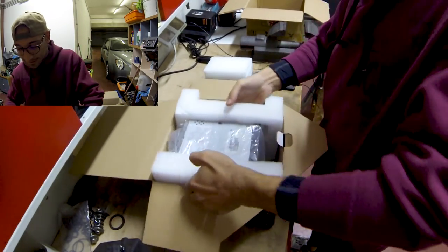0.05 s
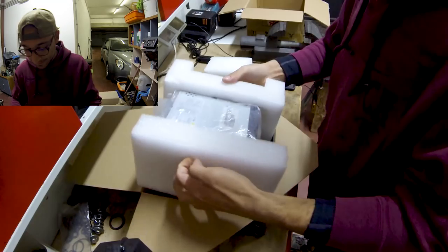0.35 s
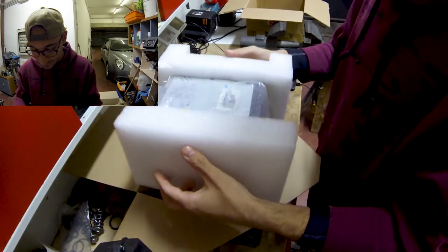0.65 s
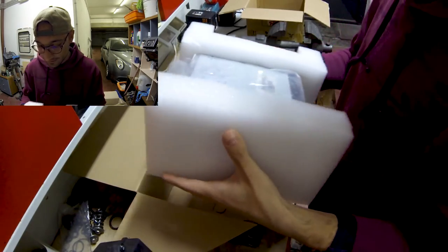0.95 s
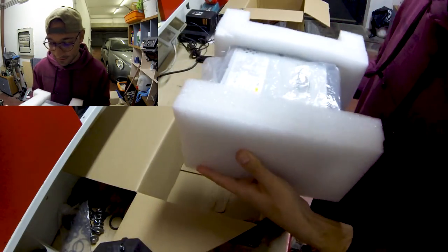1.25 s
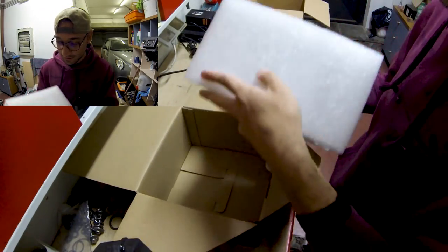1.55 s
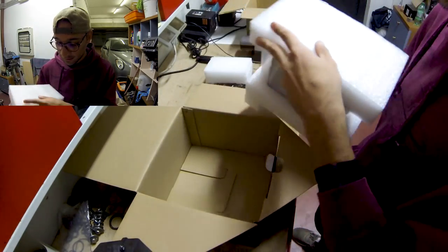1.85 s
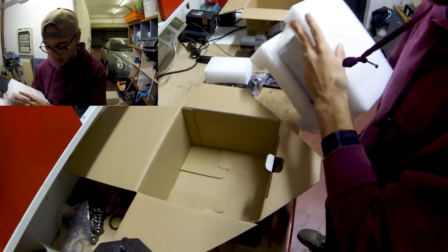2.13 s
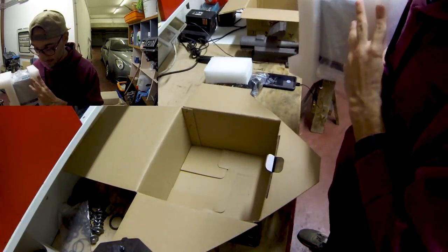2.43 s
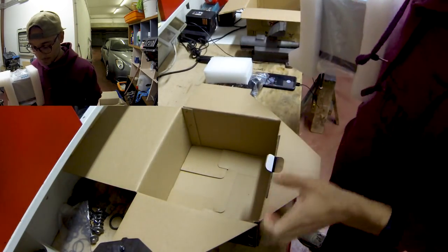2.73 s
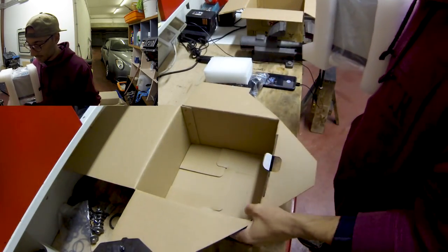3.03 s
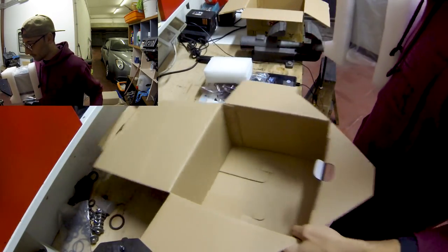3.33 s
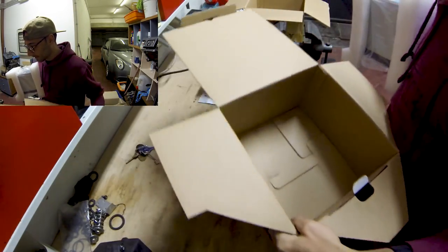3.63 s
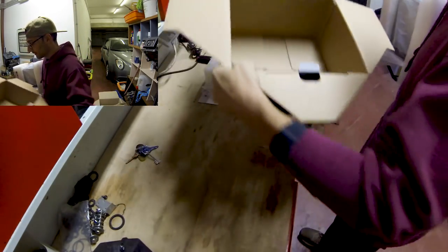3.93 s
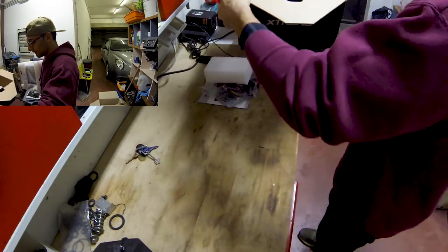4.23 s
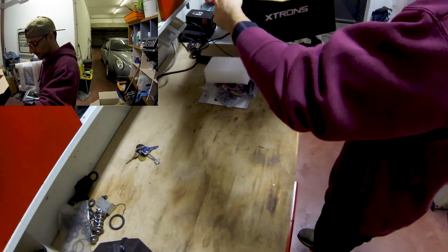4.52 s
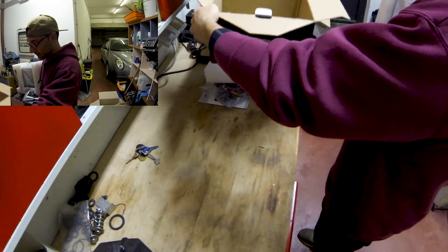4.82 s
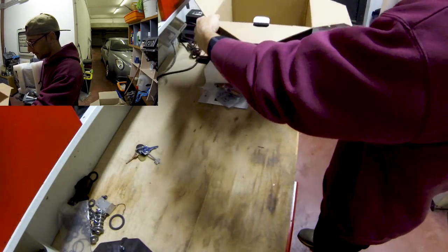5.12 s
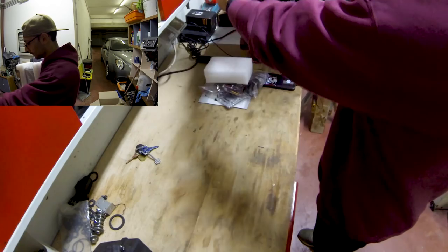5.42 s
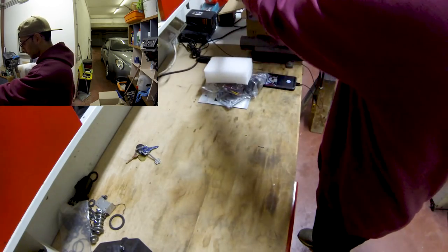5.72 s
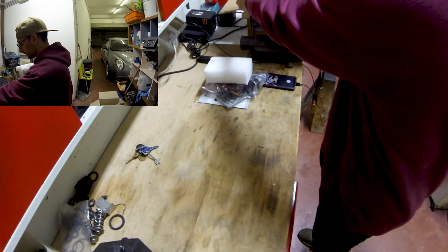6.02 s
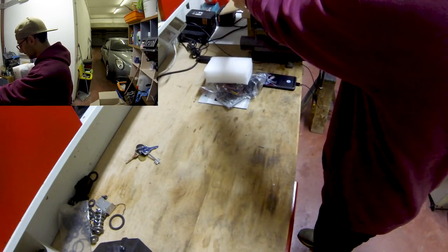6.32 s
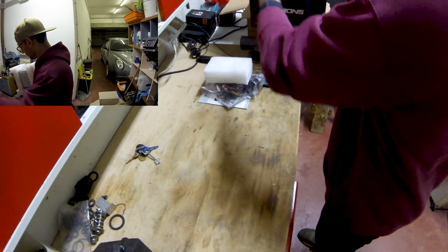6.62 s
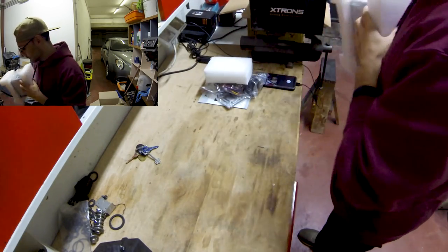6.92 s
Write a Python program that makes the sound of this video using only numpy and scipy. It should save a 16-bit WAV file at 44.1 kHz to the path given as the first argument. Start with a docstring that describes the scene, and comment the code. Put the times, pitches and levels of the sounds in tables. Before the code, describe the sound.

Foam scrapes and squeaks out of a cardboard box, then the empty box is dragged, clangs against metal and knocks down on wood.

```python
"""In a small, faintly humming garage, a foam-packed, plastic-wrapped unit is drawn out of a cardboard box.
Stick-slip friction makes the foam scrape and squeak; the box walls thump and sway, the wrapping crackles.
The empty box is dragged, a flap tapping the workbench, and is picked up with a light knock.
It clangs against something of metal, whose modes ring on, and is set down on wood with a louder knock.
Last, hands grip the foam again."""
import sys
import numpy as np
from scipy import signal
from scipy.fft import rfft, irfft, next_fast_len
from scipy.io import wavfile

SR = 44100
rng = np.random.default_rng(int(sys.argv[2]) if len(sys.argv) > 2 else 0)


def master_out(mix):
    """Clip the mix to full scale and print it as 16-bit PCM to the path in sys.argv[1]."""
    frames = np.transpose(np.atleast_2d(mix))
    ceiling = np.clip(frames, -1, 1)
    pcm = np.round(ceiling * 32767).astype(np.int16)
    wavfile.write(sys.argv[1], SR, pcm)


N = 311346
TIME = np.arange(N) / SR

# Spectrum of a sharp snap. Each row: frequency in Hz, relative spectral density in dB.
SNAP_SPECTRUM = [(200, -45), (550, -7), (900, 7), (1400, 1), (1900, 11.5), (2600, -2), (3200, 2.5),
                 (4300, -14), (5200, -7), (7300, -25), (8800, -15), (11000, -28), (15000, -41)]
# Spectrum of a dry cardboard impact. Each row: frequency in Hz, relative spectral density in dB.
CLACK_SPECTRUM = [(100, -10.5), (250, 2), (850, 1), (1350, -8), (1850, -1), (2600, -23), (3300, -16.5),
                  (4400, -27.5), (5200, -24.5), (7200, -39), (9000, -32), (15000, -42)]


def amp(db):
    """Amplitude ratio of a level in decibels."""
    return 10 ** (np.asarray(db) / 20)


def unit(x):
    """Normalisation to an rms of 1."""
    return x / np.sqrt(np.mean(x ** 2) + 1e-20)


def read(points, hz):
    """Interpolation of a table on a logarithmic frequency axis."""
    f, value = np.transpose(points)
    return np.interp(np.log(hz + 1), np.log(f + 1), value)


def add(mix, s, sound):
    """Superposition of a sound on the mix, starting at s seconds."""
    part = mix[max(round(s * SR), 0):][:len(sound)]
    part += sound[:len(part)]


def colour(x, points, tilt_db=0, skirt_db=0, size=4096):
    """Minimum-phase filter of a given spectrum; tilt about 2 kHz and outer skirts are in dB per octave."""
    hz = abs(np.fft.fftfreq(size, 1 / SR)) + 1
    octaves_outside = abs(np.log2(hz / np.clip(hz, points[0][0], points[-1][0])))
    db = read(points, hz) + tilt_db * np.log2(np.maximum(hz, 200) / 2000) - skirt_db * octaves_outside
    log_gain = np.log(amp(np.maximum(db, -100)))
    response = np.exp(np.conj(signal.hilbert(log_gain)))
    return signal.oaconvolve(x, np.fft.ifft(response).real)[:len(x)]


def wander(cutoff_hz, size=N):
    """Random fluctuation: low-pass Gaussian noise of rms 1."""
    padded = next_fast_len(size)
    hz = np.fft.rfftfreq(padded, 1 / SR)
    spectrum = rfft(rng.standard_normal(padded)) * (hz < cutoff_hz)
    return unit(irfft(spectrum, padded)[:size])


def fade(x, t60s, hold_s=0):
    """Frequency-dependent damping: after a hold, each band decays exponentially at its own rate."""
    hz, t, bands = signal.stft(x, SR, nperseg=256)
    decay = 1000. ** (-np.maximum(t - hold_s, 0) / read(t60s, hz)[:, None])
    return signal.istft(bands * decay, SR, nperseg=256)[1][:len(x)]


def ring(modes):
    """Free vibration: a sum of damped sinusoids that start together."""
    t = TIME[:2 * SR]
    return sum(amp(db) * 1000. ** (-t / t60) * np.sin(2 * np.pi * hz * t) for hz, db, t60 in modes)


def onset(rise_s):
    """Exponential rise towards 1, as when a force takes time to build."""
    return 1 - np.exp(-TIME[:2 * SR] / rise_s)


def burst(spectrum, decay_s, tilt_db=0):
    """A transient of exponentially decaying, filtered noise with a peak of about 1."""
    envelope = np.exp(-TIME[:2 * SR] / decay_s)
    noise = rng.choice([-1., 1.], len(envelope))
    crack = colour(noise * envelope, spectrum, tilt_db, skirt_db=6)
    return .5 * crack * np.linalg.norm(envelope) / np.linalg.norm(crack)


def swell(peak_s, build_s, die_s, edge_db=-16.5):
    """Envelope of a hand stroke: a rounded peak, at edge_db one build_s before and one die_s after."""
    before = np.maximum(peak_s - TIME, 0) / build_s
    after = np.maximum(TIME - peak_s, 0) / die_s
    near, gain = before + after < 4, np.zeros(N)
    gain[near] = amp(edge_db * (before[near] ** 1.7 + after[near] ** 1.56))
    return gain


def background(floor_db=-58.5, swell_db=3.0):
    """Ambient noise: hiss, amplitude-modulated rumble, and a phase-modulated hum and electrical whine."""
    # Noise floor of the room. Each row: frequency in Hz, relative spectral density in dB.
    floor_spectrum = [(20, -17.5), (32, -4), (50, -9.5), (100, -17), (170, -20), (280, -24), (420, -26),
                      (650, -28), (1400, -34.5), (1900, -33.5), (2450, -38.5), (3000, -30.5), (3800, -40.5),
                      (7000, -45.5), (11000, -48), (15000, -52)]
    # Hum and whine. Each row: frequency in Hz, rms level in dB.
    steady_tones = [(49, -59), (10645, -78), (10691, -88)]
    air = amp(floor_db) * unit(colour(rng.standard_normal(N), floor_spectrum, skirt_db=3.5))
    rumble = signal.sosfiltfilt(signal.butter(2, 200, fs=SR, output="sos"), air)
    tones = sum(amp(db) * unit(np.sin(2 * np.pi * hz * TIME + 1.03 * wander(3.4)))
                for hz, db in steady_tones)
    return air + rumble * (amp(swell_db * wander(6.1)) - 1) + tones


def rubbing(slips_per_s=2200, spread_db=2.0, judder_db=1.6):
    """Sliding friction: tiny slips, bunched by the hand's judder, excite surface, cavity, walls and foam."""
    # Spectra of the surface scrape, the box's hollow, its flexing panels and the fizz of foam cells.
    # Each row: frequency in Hz, relative spectral density in dB.
    scrape = [(1100, -34.5), (1400, -5), (1700, 2.5), (1950, 4), (2300, -1), (2600, 0), (3100, -44)]
    hollow = [(480, -25.5), (640, -8.5), (780, 2), (900, 0), (1120, 0), (1350, -7), (1650, -36)]
    panels = [(90, -7.5), (160, -1.5), (270, 1), (390, 3.5), (580, -5.5), (800, -16.5)]
    fizz = [(2100, -28), (2700, 0), (3150, 2), (3650, -1), (4300, -10), (5100, -4.5), (6200, -12.5),
            (7400, -20), (8700, -12.5), (10000, -23), (11000, -17), (12200, -29), (13400, -20.5),
            (15300, -38)]
    # The foam is drawn out, the unit turned over (2 s), the box moved (from 3 s), the foam gripped (7 s).
    # Each row: time of the hardest push, build-up and die-away in seconds, scrape level in dB,
    # then the levels of hollow, panels and fizz in dB relative to the scrape.
    strokes = [ (.01, 0.087, .2, -40, -3.5, -10.5, -9), (.18, .13, 0.31, -39.5, -3.5, -5, -1.5),
               (.355, 0.019, 0.071, -54, 4, 16, -10), (.565, 0.077, 0.04, -46, 2, -3, -1),
               (.74, 0.11, 0.11, -42, -8, -13, -5.5), (0.806, 0.068, 0.015, -40, -7, -12, -5),
               (.86, .04, 0.072, -55, 7, -6, -0.5), (1.02, 0.096, 0.077, -55.5, 6, -5, 0.5),
               (1.159, 0.081, 0.11, -43.5, -3.5, -9, -4.5), (1.421, 0.087, 0.085, -45, -3, -11, -8.5),
               (1.555, 0.068, 0.091, -44, 1.5, -13.5, -2), (1.645, .04, 0.052, -51.5, 0.5, -3, 0),
               (1.82, 0.11, 0.1, -47.5, 2, -10.5, -4), (2.006, 0.11, .08, -48, -3.5, -2, -0.5),
               (2.28, 0.13, 0.22, -60, 1.5, -2, -3), (2.435, 0.036, 0.14, -58, 4.5, 5.5, -6),
               (2.537, 0.038, 0.032, -45, -6.5, -11, -8.5), (2.55, 0.096, 0.17, -62.5, 1, -1, -4.5),
               (2.959, .003, 0.044, -52, 6.5, -3, -4.5), (3.015, 0.043, 0.056, -48, 1, 1.5, -2.5),
               (3.133, 0.039, 0.074, -57, 6, 6, -3.5), (3.214, 0.042, 0.044, -55, 2, 0, -3),
               (3.544, 0.037, 0.044, -61, -1, -13, -6), (3.604, 0.025, 0.025, -66, 15, 0, 6),
               (3.745, 0.12, 0.052, -63.5, 0, -3, -2), (4.15, 0.15, 0.18, -66, 1.5, -7, -4),
               (4.29, 0.049, 0.08, -67, 4, -3, -5), (4.43, 0.044, 0.13, -68.5, 1.5, -15, -9),
               (6.945, 0.018, 0.044, -48, 10.5, 2.5, -2), (6.985, 0.17, 0.083, -53.5, 0.5, 0, -6.5)]
    sizes = amp(spread_db * np.minimum(rng.exponential(1, N), 4)) * rng.choice([-1, 1], N)
    slips = unit(sizes * (rng.random(N) < slips_per_s / SR))
    friction = (slips + rng.standard_normal(N)) * amp(judder_db * wander(63))
    voices = np.array([unit(colour(friction, spectrum, skirt_db=23.0))
                       for spectrum in (scrape, hollow, panels, fizz)])
    power = np.zeros_like(voices)  # overlapping strokes add in power
    for s, build_s, die_s, db, hollow_db, panels_db, fizz_db in strokes:
        gains = amp(db) * amp([0, hollow_db, panels_db, fizz_db])
        power += np.outer(gains, swell(s, build_s, die_s)) ** 2
    return (np.sqrt(power) * voices).sum(0)


def squeaks(relative_width=.12):
    """Stick-slip oscillation: foam or cardboard catches and lets go at an unsteady, gliding rate."""
    # Each row: time of the loudest moment, build-up and die-away in seconds, level in dB,
    # pitch in Hz, glide in octaves per second.
    slides = [(.005, 0.023, 0.076, -46.5, 3110, -0.8), (.13, 0.93, 0.74, -42.5, 1085, 0.04),
              (.565, 0.016, 0.0093, -38.5, 3480, 0.5), (.742, 0.062, 0.05, -39.5, 3207, 1.3),
              (.81, .035, 0.013, -42, 3580, -0.2), (1.04, 0.03, 0.025, -55, 3210, 1),
              (1.42, 0.036, .025, -43, 1119, -.8), (1.566, 0.027, 0.099, -49, 905, -2.5),
              (1.805, 0.049, 0.065, -45, 925, -2), (3.09, .13, 0.18, -54, 860, 0),
              (3.21, .03, .025, -54.5, 1945, 0), (3.755, .15, 0.04, -58, 925, 0.1),
              (6.945, 0.018, 0.017, -45, 3400, 4)]
    out = np.zeros(N)
    for s, build_s, die_s, db, hz, glide in slides:
        start, width_hz = max(s - .5, 0), relative_width * hz
        pitch_hz = hz * 2 ** (glide * (start + TIME[:SR] - s))
        cycles = np.cumsum(pitch_hz) / SR
        flutter = unit(wander(width_hz / 2, size=SR) + 0.7 * wander(width_hz * 1.5, size=SR))
        phase_jitter = wander(width_hz / 3, size=SR)
        tone = np.zeros(N)
        add(tone, start, unit(flutter * np.sin(2 * np.pi * cycles + phase_jitter)))
        out += amp(db) * swell(s, build_s, die_s) * tone
    return out


def thumps(push_s=0.0013):
    """Damped plate vibration: a softly pushed cardboard wall swings briefly in its lowest modes."""
    # Each row: start in seconds, pitch in Hz, level in dB, overtone level in dB, T60 in seconds.
    flexes = [(.174, 92, -47, -21, 0.055), (.242, 89.6, -21.5, -22.5, 0.15), (.279, 52.5, -29, -44, 0.22),
              (.349, 94.8, -23, -18.5, .1), (.398, 87.6, -38, -33.5, 0.31), (0.577, 106, -36, -45.5, 0.11),
              (2.9601, 86, -44, -23, 0.14), (3.101, 65, -39, -41, 0.18), (3.137, 109, -25.5, -38, 0.048),
              (3.171, 82, -22, -23, 0.047), (3.207, 51, -33.5, -54, 0.19), (3.336, 88, -35, -49, .14),
              (3.608, 96, -33, -32.5, 0.15), (5.946, 97, -25.5, -27, .12), (6.94, 114, -32, -48, 0.069)]
    # Overtones of a wall. Each row: frequency ratio, level offset in dB, T60 ratio.
    wall_modes = [(2.06, -0.5, 0.61), (4.15, -16, 0.65)]
    out = np.zeros(N)
    for s, hz, db, overtone_db, t60 in flexes:
        fundamental = ring([(hz, db, t60)])
        overtones = ring([(hz * hz_ratio, overtone_db + offset_db, t60 * t60_ratio)
                          for hz_ratio, offset_db, t60_ratio in wall_modes])
        add(out, s, onset(push_s) * (fundamental - overtones))  # overtones start in opposite phase
    return out


def crackles():
    """Impulsive release: single large slips and snaps of wrapping and foam radiate short cracks."""
    # Each row: start in seconds, approximate peak level in dB, treble tilt in dB per octave.
    snaps = [(.339, -29.5, 5.5), (0.4324, -31, -15), (.5645, -27.5, 5.5), (.6295, -31, 1.5),
             (0.7365, -24, -1), (.7611, -29, 1.5), (.8074, -22.5, 0.5), (0.9958, -31.5, 0),
             (1.1024, -30, -5), (1.1538, -31, -6.5), (1.3593, -37, -1.5), (2.2222, -42.5, -2.5),
             (2.4163, -35, -0.5), (2.496, -33.5, 0), (3.1288, -36.5, 1.5), (6.941, -30.5, 3),
             (6.9644, -26, 3.5), (7.015, -33, -4)]
    out = np.zeros(N)
    for s, db, tilt_db in snaps:
        add(out, s, amp(db) * burst(SNAP_SPECTRUM, decay_s=0.0036, tilt_db=tilt_db))
    return out


def sway(start_s=0.63, settle_s=2.02, attack_s=0.11, release_s=0.31, level_db=-56):
    """Forced vibration: the wide box walls wobble with a low rumble as the load comes out, then settle."""
    # Each row: frequency in Hz, relative spectral density in dB.
    rumble_spectrum = [(30, -26), (55, 2.5), (95, -4), (140, -22), (220, -34)]
    rise = np.clip((TIME - start_s) / attack_s, 0, 1)
    fall = np.exp(-np.maximum(TIME - settle_s, 0) / release_s)
    rumble = unit(colour(rng.standard_normal(N), rumble_spectrum, skirt_db=31))
    return amp(level_db) * rise * fall * rumble


def flap(give_s=0.001):
    """Soft impacts: a loose flap bounces on the bench, each tap scuffing it and exciting its modes."""
    # Each row: start in seconds, gain in dB.
    taps = [(3.3339, -30), (3.3619, -28.5), (3.389, -40)]
    # Each row: frequency in Hz, relative level in dB, T60 in seconds.
    flap_modes = [(339, 4, 0.083), (389, -5, 0.097), (510, -9, 0.25), (1038, 0.5, 0.05), (1110, -8, 0.041),
                  (1770, -8, 0.023), (2300, -13, 0.027), (3720, -15, 0.026)]
    out, ringing = np.zeros(N), amp(-6.5) * ring(flap_modes)
    for s, db in taps:
        scuff = amp(-11) * burst(CLACK_SPECTRUM, decay_s=0.01, tilt_db=3.0)
        add(out, s, amp(db) * onset(give_s) * (ringing + scuff))
    return out


def knocks(give_s=0.00041, boost_db=9, width_octaves=.4):
    """Modal excitation: the box clacks on wood, and the modes moving most at the contact ring strongest."""
    # Each row: start in seconds, gain in dB, clack tilt in dB per octave, favoured frequency in Hz.
    contacts = [(3.6025, -41, -2.5, 790), (5.9345, -47.5, -17, 800), (5.9445, -22.5, -1.2, 245)]
    # Each row: frequency in Hz, relative level in dB, T60 in seconds.
    box_modes = [(195, -9, 0.13), (256, 5, 0.067), (331.4, 2, 0.23), (545, 3.5, 0.073), (606, 1, 0.11),
                 (718, 9, 0.054), (832, 7.5, 0.051), (1068, -21, 0.27), (1170, -5.5, 0.066),
                 (1870, -2, 0.022), (1834, 8, 0.018), (2020, -28, 0.036)]
    out, give = np.zeros(N), onset(give_s)  # cardboard yields before it stops
    for s, db, tilt_db, favoured_hz in contacts:
        modes = [(hz, level + boost_db * np.exp(-(np.log2(hz / favoured_hz) / width_octaves) ** 2), t60)
                 for hz, level, t60 in box_modes]
        clack = burst(CLACK_SPECTRUM, decay_s=0.019, tilt_db=tilt_db)
        add(out, s, amp(db) * give * (amp(-10.5) * ring(modes) + clack))
    return out


def clang(strike_s=4.7075, chatter_s=0.04):
    """Lightly damped resonance: struck metal chatters and rings on as the blow spreads into its modes."""
    # Distinct modes. Each row: frequency in Hz, relative level in dB, T60 in seconds.
    metal_modes = [(142.4, -11.5, 2.3), (182.6, -9, 1.26), (239, -4.5, 0.46), (352.5, -11.5, 1.06),
                   (388, -17, 1.8), (499, -8, 0.98), (531, -3.5, 0.85), (757, 0, 0.41), (735, 2, 0.4),
                   (787, -0.5, 0.38), (860, -4.5, 0.95), (914, -1.5, 0.6), (1040, 4, 0.22),
                   (1083, -9, 0.53), (1235, -16, 1.31), (1380, -7.5, .7), (1560, -10, .8),
                   (1633, -3.5, 0.58), (1740, -7.5, 0.89), (1910, -11, 0.77), (1910, 1.5, 0.4),
                   (2030, -21, .55), (2135, -0.5, 0.53), (2234, -15, 0.44), (2800, -18, .45),
                   (3010, -8.5, 0.49), (3660, -21, 0.57), (4940, -21, 0.3), (6030, -21, 0.23)]
    # The dense ring between those modes. Each row: frequency in Hz, relative spectral density in dB.
    dense_spectrum = [(60, -7), (130, 2), (240, -1.5), (420, 0), (850, -0.5), (1300, -9), (2050, 2.5),
                      (2600, -14), (3100, -11.5), (4200, -20), (5100, -22), (7000, -30), (9000, -25),
                      (12500, -45), (15300, -41)]
    # Damping of the dense ring. Each row: frequency in Hz, T60 in seconds.
    dense_t60s = [(100, 1.86), (400, 0.76), (1000, 1.11), (2000, 0.58), (4000, 0.49), (8000, 0.18),
                  (14000, 0.12)]
    out = np.zeros(N)
    chatter = unit(colour(rng.standard_normal(2 * SR), dense_spectrum))
    add(out, strike_s, amp(-34.0) * fade(chatter, dense_t60s, chatter_s) * onset(0.0011))
    add(out, strike_s, amp(-33.0) * ring(metal_modes) * onset(0.0093))
    # contact noise: a light first touch, then the clack and snap of the blow
    add(out, strike_s - .005, amp(-34) * burst(CLACK_SPECTRUM, decay_s=.005))
    add(out, strike_s + 0.00108, amp(-20.5) * burst(CLACK_SPECTRUM, decay_s=.012, tilt_db=3.0))
    add(out, strike_s + .002, amp(-31) * burst(SNAP_SPECTRUM, decay_s=.009, tilt_db=3.5))
    return out


def garage(x, reflections_per_s=3000, delay_s=.007):
    """Diffuse reverberation: scattered reflections from near walls, the deep bass lasting longest."""
    # Each row: frequency in Hz, reverberation time T60 in seconds.
    room_t60s = [(80, 1), (250, 0.55), (1000, 0.72), (2000, 0.75), (4000, 0.49), (12000, 0.57)]
    signs = rng.choice([-1., 1.], SR)
    arrivals = (rng.random(SR) < reflections_per_s / SR) * (TIME[:SR] > delay_s)
    tail = fade(signs * arrivals, room_t60s)
    return signal.oaconvolve(x, tail / np.linalg.norm(tail))[:N]


def scene():
    """Direct and reverberant sound add; the knocks, a little farther off, have the most reverberation."""
    handling = rubbing() + squeaks() + crackles()
    walls = thumps() + flap() + sway()
    blows, metal = knocks(), clang()
    room = garage(amp(-13.5) * handling + amp(-10.5) * walls + amp(-7.5) * blows + amp(-14.0) * metal)
    return (handling + walls + blows + metal + room + background())[None]


def record(dry, cutoff_hz=15250):
    """Band limiting: a steep linear-phase low-pass filter removes the highest treble."""
    lowpass = signal.firwin(601, cutoff_hz, window=("kaiser", 9), fs=SR)
    return signal.oaconvolve(dry, lowpass[None], "same")


dry = scene()
out = record(dry)
master_out(out)
```